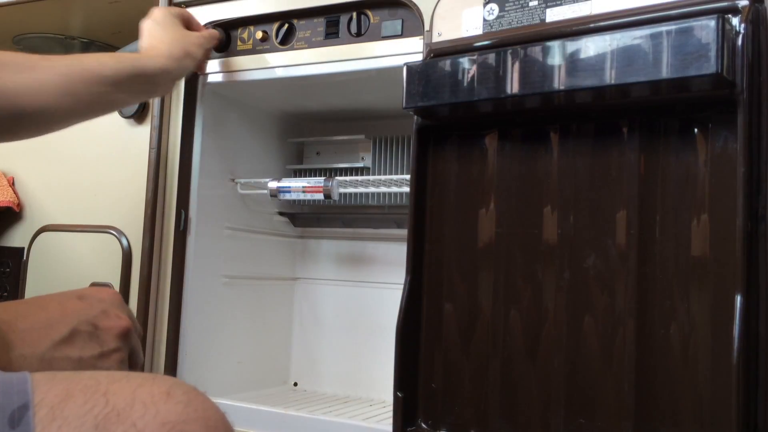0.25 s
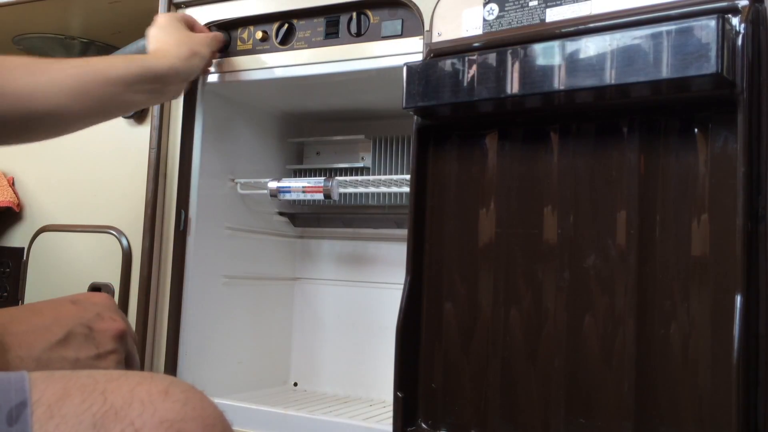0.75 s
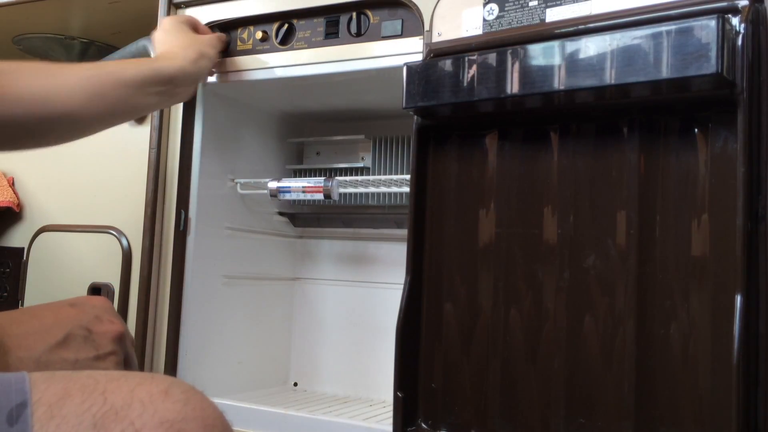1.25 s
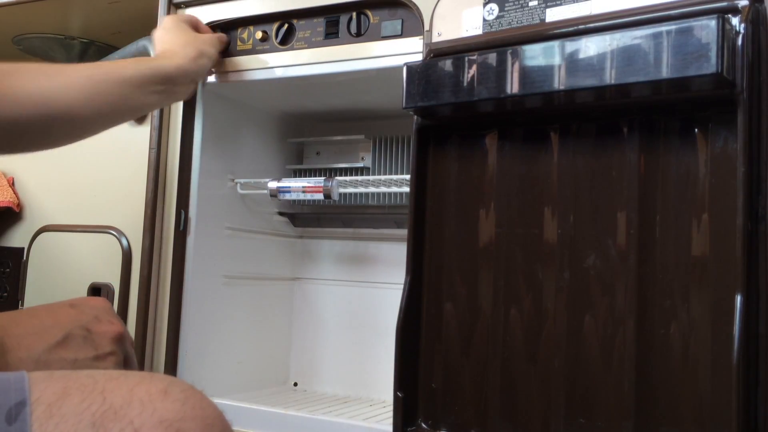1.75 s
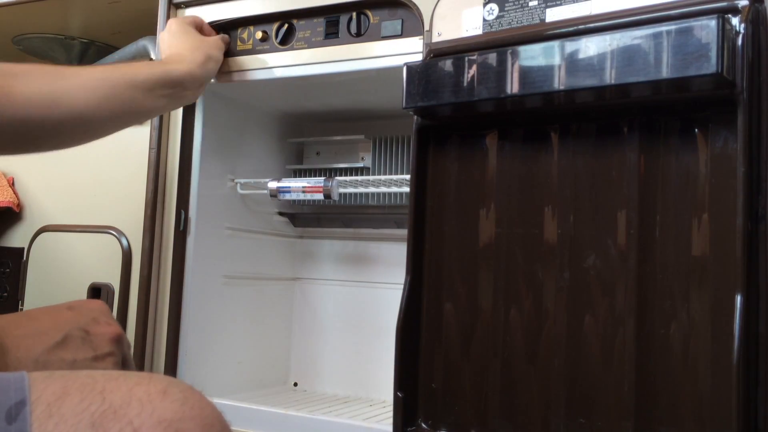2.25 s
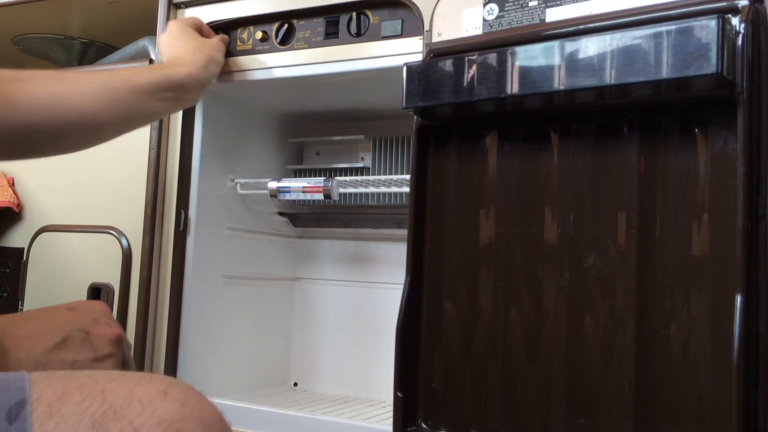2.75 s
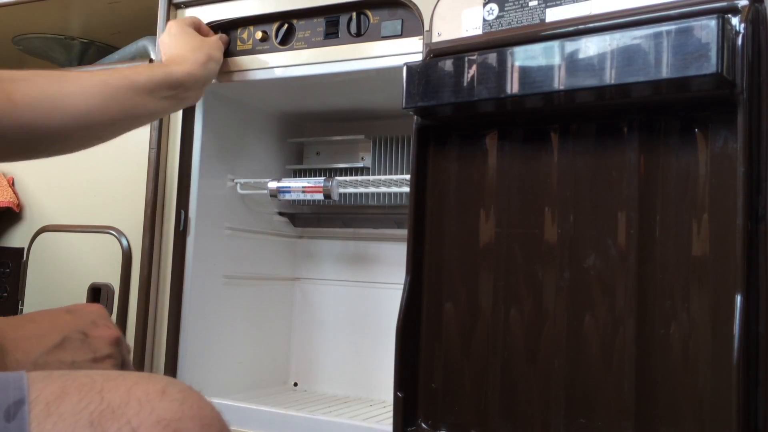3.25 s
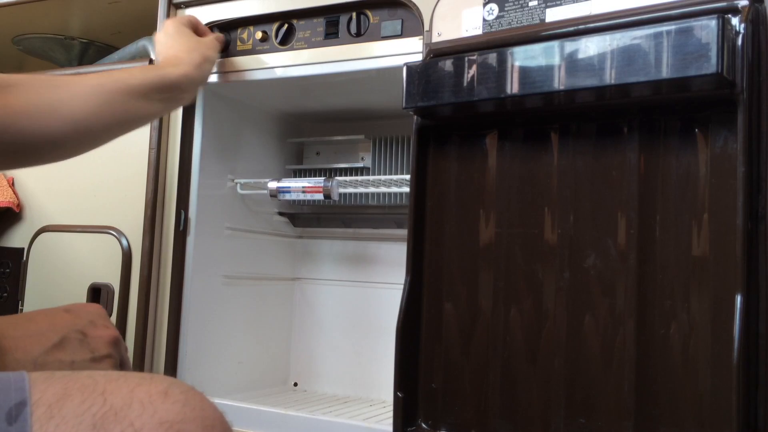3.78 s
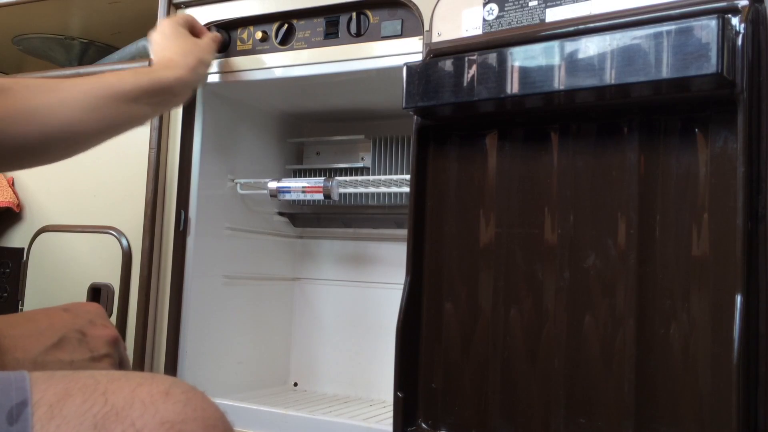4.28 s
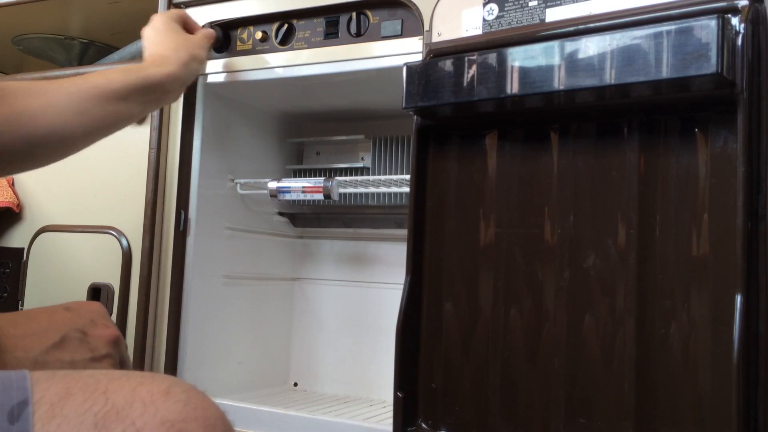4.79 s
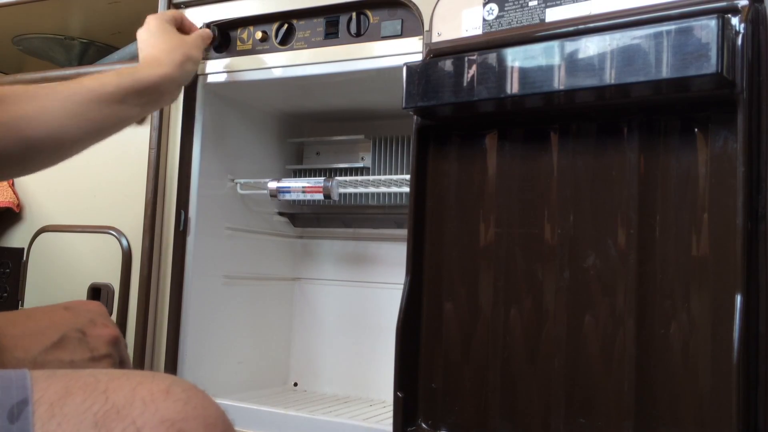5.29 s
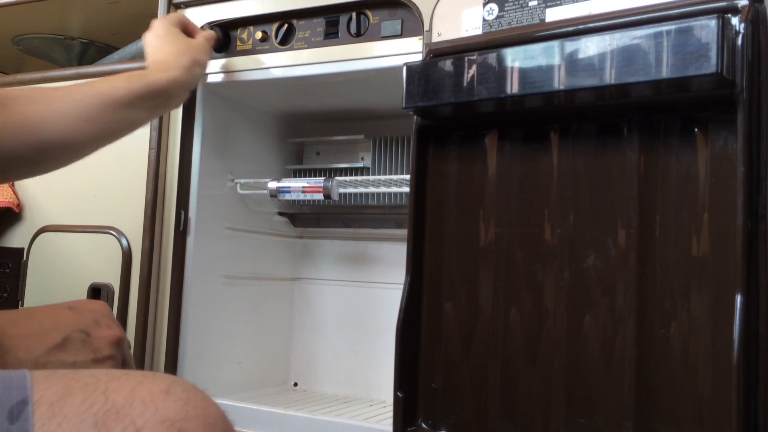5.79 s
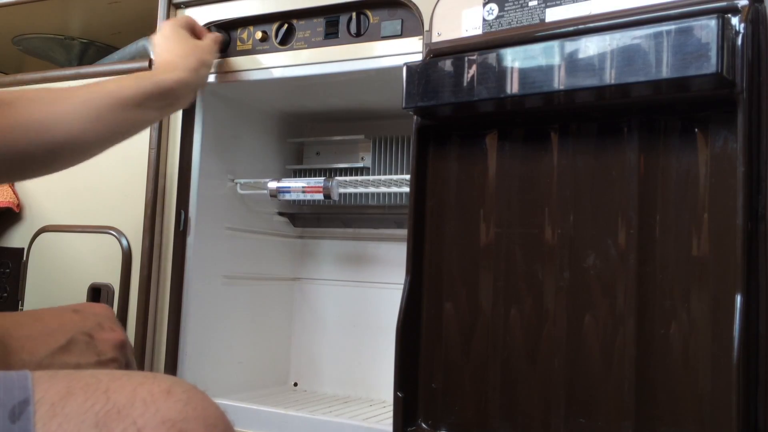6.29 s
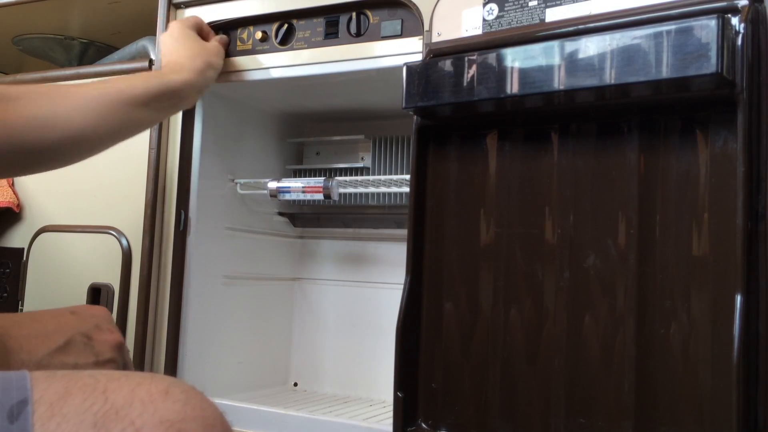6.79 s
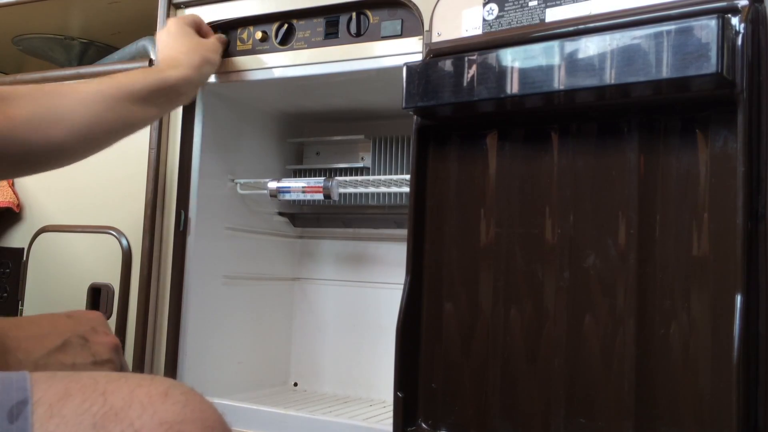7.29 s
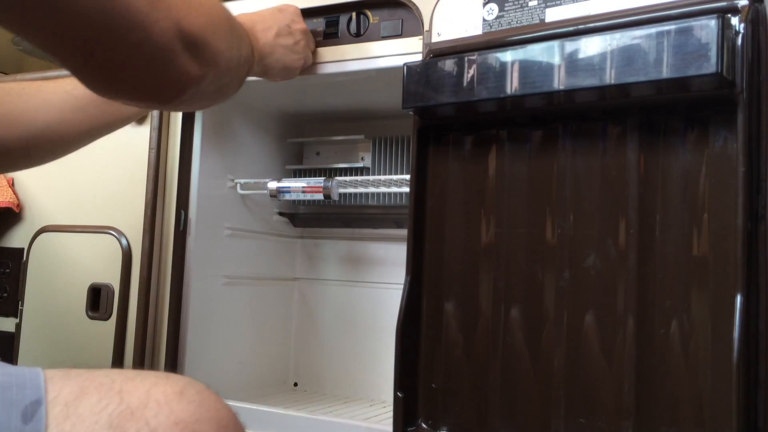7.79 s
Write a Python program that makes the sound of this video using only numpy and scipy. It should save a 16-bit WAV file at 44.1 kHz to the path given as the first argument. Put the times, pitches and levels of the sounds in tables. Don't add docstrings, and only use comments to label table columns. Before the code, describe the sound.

Rapid steady mechanical clacking, each push a rising squeak and hard slam then a duller knock back, close up in a quiet camper cabin.

```python
import sys
import numpy as np
from scipy import signal
from scipy.fft import rfft, irfft
from scipy.io import wavfile
from scipy.ndimage import map_coordinates

SR = 44100
rng = np.random.default_rng(int(sys.argv[2]) if len(sys.argv) > 2 else 0)


def gain_from_db(level_db):
    decades = np.asarray(level_db, float) / 20
    return 10 ** decades


def generate_wav(signal):
    frames = np.transpose(np.atleast_2d(signal))
    scaled = np.clip(frames, -1, 1) * 32767
    pcm = np.round(scaled).astype(np.int16)
    wavfile.write(sys.argv[1], SR, pcm)


N = 354475


def unit(x):
    return x / np.sqrt(np.mean(x ** 2) + 1e-20)


def along(points, hz):
    f, v = np.transpose(points)
    return np.interp(np.log(hz + 1), np.log(f + 1), v)


def wobble(rate):
    knots = rng.standard_normal(int(N * rate / SR) + 4)
    return map_coordinates(knots, [np.arange(N) * rate / SR])


def causal(x, gain):
    size = 2 ** 13
    cepstrum = irfft(np.log(gain(np.fft.rfftfreq(size, 1 / SR)) + 1e-6))
    cepstrum[1:size // 2] *= 2
    cepstrum[size // 2 + 1:] = 0
    impulse = irfft(np.exp(rfft(cepstrum)))
    return signal.oaconvolve(x, impulse / np.linalg.norm(impulse))[:len(x)]


def resonant(modes, hz):
    return sum(gain_from_db(2 * db) / (1 + (2 * (hz - c) / max(w, 42)) ** 2) for c, w, db in modes)


def swell(t, rise, t60, hold):
    shape = (1 - np.exp(-t / rise)) * gain_from_db(-60 * t / t60) * np.exp(-(t / hold) ** 4)
    return shape / shape.max()


def tone(hz):
    return np.sin(2 * np.pi * (np.cumsum(hz) / SR + rng.random()))


def toned(events, usual_db, boom_db, body_db, boom_share, body_share):
    rows = []
    for s, db, *extra_boom in events:
        harder = db - usual_db
        boom = boom_db - boom_share * harder + sum(extra_boom)
        rows.append((s, db, boom, body_db - body_share * harder))
    return rows


def contacts(events, shake, modes, colour, boom_db, valley_db, grit_db, jolts):
    t = np.arange(SR // 8) / SR

    def body(hz):
        between_modes = gain_from_db(2 * (along(colour, hz) + valley_db))
        return np.sqrt(resonant(modes, hz) + between_modes)

    def edge(hz, corner):
        return 1 / np.sqrt(1 + (hz / corner) ** 8)

    bands = [lambda hz: edge(hz, 900),
             lambda hz: edge(900, hz + 1) * edge(hz, 4500),
             lambda hz: edge(4500, hz + 1)]
    out = np.zeros(N)
    for k, timing in enumerate(shake):
        level = np.zeros(N + len(t))
        for s, db, low_db, body_db in events:
            band_db = (low_db + boom_db, body_db, 0)[k]
            level[round(s * SR):][:len(t)] += gain_from_db(db + band_db) * swell(t, *timing)
        force = level[:N] * gain_from_db(grit_db * wobble(jolts)) * rng.standard_normal(N)
        out += causal(force, lambda hz: body(hz) * bands[k](hz))
    return out


def hollow(events, hz, bend, shake, level_db):
    t = np.arange(SR // 8) / SR
    out = np.zeros(N + len(t))
    for s, db, boom_db, _ in events:
        note = tone(hz * (1 + 0.019 * rng.standard_normal()) + bend * t)
        out[round(s * SR):][:len(t)] += gain_from_db(db + boom_db + level_db) * swell(t, *shake) * note
    return out[:N] * gain_from_db(2.5 * wobble(110))


def chime(events, modes, t60, scatter_db, level_db):
    t = np.arange(SR // 8) / SR
    hz, _, mode_db = np.transpose(modes)[..., None]
    luck = rng.standard_normal((len(events), 2, len(modes), 1))
    out = np.zeros(N + len(t))
    for (s, db, *_), (size, drift) in zip(events, luck):
        sines = np.sin(2 * np.pi * hz * (1 + .012 * drift) * t)
        ring = gain_from_db(.4 * mode_db + scatter_db * size) * sines
        out[round(s * SR):][:len(t)] += gain_from_db(db + level_db) * swell(t, 0.00094, t60, 0.025) * ring.sum(0)
    return out[:N] * gain_from_db(4 * wobble(400))


# t/s, level/dB
RUMBLE_LEVEL = [(0.0, -35.5), (0.06, -52.5), (0.42, -48), (0.54, -51), (2.2, -50.5), (2.64, -47),
                (2.98, -54), (3.2, -46), (3.5, -52.5), (7.3, -51.5), (8.04, -58.5)]
RUSTLE_LEVEL = [(0.0, -59.5), (7.3, -56), (8.04, -64.5)]
# f/Hz, level/dB per Hz
RUMBLE_COLOUR = [(12, -45.5), (20, -12.5), (96, 4), (153, 3), (193, -18), (230, -2.5), (300, -9),
                 (510, -120)]
RUSTLE_COLOUR = [(250, -36), (500, 12.5), (1000, 5), (2000, -5.5), (3500, -13.5), (8000, -18), (15000, -21)]
HISS_COLOUR = [(120, -21.5), (200, -21), (259, -13.5), (579, -30.5), (2420, -32), (3250, -33), (8270, -38),
               (11700, -39.5), (14600, -44), (16000, -49)]


def cabin_air():
    def level(curve):
        return np.interp(np.arange(N) / SR, *np.transpose(curve))

    def noise(colour):
        return unit(causal(rng.standard_normal(N), lambda hz: gain_from_db(along(colour, hz))))

    rumble = gain_from_db(level(RUMBLE_LEVEL) + 3 + 1.5 * wobble(9)) * noise(RUMBLE_COLOUR)
    rustle = gain_from_db(level(RUSTLE_LEVEL) - 4 + 2.5 * wobble(14) + 3 * wobble(200)) * noise(RUSTLE_COLOUR)
    hiss = gain_from_db(-66.5 + 1.4 * wobble(21)) * noise(HISS_COLOUR)
    return rumble + rustle + hiss


# start t/s, end t/s, f/Hz, level/dB
RINGS = [(0, 0.252, 104.1, -41.5), (0.241, 0.443, 116.3, -34.5), (0, 0.287, 181.6, -45),
         (.083, 0.122, 1222, -46.5), (0.093, 0.122, 5120, -56), (.09, 0.14, 3870, -64),
         (0.146, 0.183, 555, -51), (3.93, 4.0, 2600, -70), (4.668, 4.73, 2600, -73),
         (6.775, 6.85, 3850, -76), (7.664, 7.71, 4650, -64)]


def rings():
    out, unsteady = np.zeros(N), wobble(300)
    for start, end, hz, db in RINGS:
        span = slice(round(start * SR), round(end * SR))
        size = span.stop - span.start
        rough = 1 + min(hz / 1500, .6) * unsteady[span]
        out[span] += gain_from_db(db - 3) * np.hanning(size) ** 0.14 * rough * tone(np.full(size, hz))
    return out


# t/s, sizzle peak level/dB, boom and body level/dB relative to it
RAPS = [(0.0004, -41.5, -4.5, 4.5), (0.197, -46, -16, -6), (0.2767, -39.5, -6, 1.5),
        (1.4984, -38, -3.5, 5.5), (1.753, -37.5, -8, 1.5), (2.2455, -40, -7, 4), (2.4735, -30.5, -10, 8),
        (2.741, -49, -2.5, 8), (3.2248, -27.5, -10.5, 2), (4.198, -65, 10.5, 11), (4.4473, -40.5, -3.5, 5),
        (5.3728, -34.5, -9, 2.5), (5.8485, -47, -1, 15), (6.082, -50.5, -0.5, 5), (6.319, -38.5, -6, 6.5),
        (6.556, -48.5, 0.5, 9)]
# rise t/s, t60 t/s, damped-out t/s
STRIP_SHAKE = [(0.0029, 0.29, 0.046), (0.0011, 0.064, 0.05), (0.00093, 0.081, 0.045)]
# f/Hz, width/Hz, level/dB
STRIP_MODES = [(937, 45, -15), (1320, 84, -15), (1610, 80, -15.5), (1920, 170, -17.5), (2690, 60, -25.5),
               (6920, 68, -19.5)]
# f/Hz, level/dB per Hz
STRIP_COLOUR = [(71, -61), (120, -17), (301, -9.5), (1620, -20.5), (2430, -26), (2700, -12.5),
                (4410, -36.5), (6910, -28), (12500, -32.5), (16000, -80)]


def strip_raps():
    blows = contacts(RAPS, STRIP_SHAKE, STRIP_MODES, STRIP_COLOUR,
                     boom_db=10.0, valley_db=-8.0, grit_db=1.5, jolts=230)
    return gain_from_db(-6.0) * blows + hollow(RAPS, 298.7, 120, (.008, .2, .05), level_db=7.0)


# t/s, sizzle peak level/dB, boom and body level/dB relative to it
STRAY_TICKS = [(0.054, -51, 3, -14), (0.083, -45.5, -1, 5), (0.1274, -57, 15, 11), (1.5574, -47.5, -6, 3),
               (1.808, -48, -17, 4), (2.292, -45, -8, 5), (3.29, -45.5, 10, 2), (3.498, -52.5, 0, 3),
               (7.8016, -53, 9, 6), (7.889, -49, -3, -15)]
# t/s, sizzle peak level/dB
RELEASES = [(0.4489, -42), (1.1762, -42), (1.4217, -51), (1.6697, -36), (1.919, -36.5), (2.403, -34),
            (2.6583, -36), (3.1456, -40), (3.396, -36), (3.8776, -44), (4.353, -54), (4.598, -37.5),
            (5.066, -48), (5.5323, -43), (5.7665, -52), (6.4702, -40), (6.71, -57), (6.9396, -39.5),
            (7.6215, -45)]
LATCH_TONE = (-43, 0, -1, 0.84, 1.4)
# rise t/s, t60 t/s, damped-out t/s
LATCH_SHAKE = [(0.0043, 0.055, 0.01), (0.00012, 0.064, 0.09), (0.00054, 0.087, 0.063)]
# f/Hz, width/Hz, level/dB
LATCH_MODES = [(305, 180, 1), (1320, 380, 0.5), (4140, 58, 0), (7300, 420, -9)]
# f/Hz, level/dB per Hz
LATCH_COLOUR = [(120, -18), (500, -12), (2000, -4), (4000, -11.5), (7000, -19), (15000, -26)]


def latch_ticks():
    events = toned(RELEASES, *LATCH_TONE) + STRAY_TICKS
    return gain_from_db(-12.5) * contacts(events, LATCH_SHAKE, LATCH_MODES, LATCH_COLOUR,
                                 boom_db=4.5, valley_db=2, grit_db=5.5, jolts=210)


# start t/s, squeak top f/Hz, squeak level/dB, scrape level/dB
PUSHES = [(0.329, 5120, -50, -56.5), (0.574, 5900, -50, -53.5), (0.814, 5400, -53, -53),
          (1.05, 6200, -46.5, -54), (1.295, 5900, -45, -54), (1.535, 6500, -45, -53.5),
          (1.801, 5700, -44.5, -58.5), (2.033, 6250, -44, -53.5), (2.285, 6900, -42, -57),
          (2.528, 6400, -42.5, -55), (2.776, 6000, -46, -54.5),
          (3.034, 6570, -48, -53), (3.276, 5600, -42.5, -57.5), (3.509, 5570, -45, -52),
             (3.753, 5780, -44, -53.5), (3.993, 5740, -44, -52.5), (4.234, 6700, -39.5, -51.5),
             (4.476, 5770, -40.5, -55.5), (4.713, 6100, -42.5, -56), (4.942, 6200, -45, -53),
             (5.182, 5600, -46, -55), (5.416, 6250, -42, -52.5), (5.644, 6330, -45, -60),
             (5.888, 5400, -43.5, -58), (6.123, 5640, -45, -62), (6.355, 6400, -43, -51.5),
             (6.59, 5840, -45, -58), (6.824, 6400, -49, -53), (7.041, 6600, -53, -55.5),
             (7.292, 5670, -51, -53.5), (7.498, 5000, -52, -54)]
# f/Hz, level/dB
SEAL = [(1500, -20), (3500, -17), (4600, -12), (5150, -2), (6000, -1), (7500, -4)]
# f/Hz, width/Hz, level/dB
STEM = [(305, 61, 6), (1420, 1040, 10.5), (3800, 2600, -3.5)]


def push():
    squeak, rub = np.zeros(N), np.zeros(N)
    waver, flutter = wobble(500), gain_from_db(3.7 * wobble(180))
    broken = (.7 + .6 * wobble(600)) * gain_from_db(2 * wobble(130))
    grind, beat = .6 + .7 * wobble(330), wobble(90)
    stops = np.sort([row[0] for row in SLAM_EARLY + SLAM_LATE + GRAZES])
    for s, top_hz, squeak_db, scrape_db in PUSHES:
        stop = stops[stops > s][0]
        speed_up = (stop - s) * (.065 + .1 * max(top_hz - 5000, 0) / 1000)
        loudest = stop - .027
        span = slice(round(s * SR), round(stop * SR))
        t = np.arange(span.stop - span.start) / SR
        hz = top_hz * (1 - np.exp(-t / speed_up)) * (1 + .015 * waver[span])
        fade = .22 + .78 * np.exp(-((t + s - loudest) / .02) ** 2)
        stem_hz = 880 + 6500 * t
        sidebands = gain_from_db(-19 + 3 * beat[span]) * grind[span] * (tone(hz + stem_hz) + tone(.72 * hz))
        radiated = gain_from_db(squeak_db - 2 + along(SEAL, hz))
        squeak[span] += radiated * fade * broken[span] * (tone(hz) + sidebands)
        stem_level = gain_from_db(scrape_db + 5) * swell(t, 0.00944, 0.17, 0.13)
        squeak[span] += stem_level * grind[span] * tone(stem_hz)
        dig_in = 7.5 * np.exp((t - t[-1]) / 0.0063)
        rub[span] += gain_from_db(scrape_db - 7.5) * (np.minimum(t / 0.013, 1) + dig_in)
    scrape = causal(rub * flutter * rng.standard_normal(N), lambda hz: np.sqrt(resonant(STEM, hz)))
    return squeak + scrape


# t/s, sizzle peak level/dB
SLAM_EARLY = [(0.3972, -28.5), (0.629, -23.5), (0.8709, -24.5), (1.1094, -23), (1.3588, -24),
              (1.6059, -24.5), (1.8547, -24.5), (2.0932, -23), (2.3359, -21.5), (2.588, -24),
              (2.8419, -23.5)]
SLAM_LATE = [(3.081, -23), (3.3398, -28.5), (3.5668, -24), (3.8157, -25.5), (4.0537, -26), (4.2896, -23),
             (4.5431, -25), (4.7671, -22.5), (5.0065, -23.5), (5.2345, -24), (5.474, -23.5),
             (5.7014, -23.5), (5.9539, -28), (6.1868, -27), (6.4143, -24), (6.6568, -26), (6.8803, -23),
             (7.0993, -22.5), (7.3472, -26), (7.5502, -25)]
# t/s, sizzle peak level/dB, boom and
# body level/dB relative to it
GRAZES = [
    (3.3244, -37, 6.5, 6.6),
    (5.9399, -49.5, 11, 2.9),
    (6.1701, -46, 9, 5),
    (6.6444, -44, 7.5, 3.9),
    (7.8432, -44, -21, 0.17),
    (7.9972, -60, 2, 9.8),
]
SLAM_TONE = (-24, -4.5, -2, -0.5, 0.35)
# rise t/s, t60 t/s, damped-out t/s
SLAM_SHAKE = [(.008, .15, .042), (.001, .095, .042), (.0006, .085, .04)]
# f/Hz, width/Hz, level/dB
PANEL_MODES = [(282.6, 23.3, 1), (484, 19, -1.5), (912, 52, -6), (1602, 50, -5), (2716, 170, -11),
               (3448, 112, -14.5), (4090, 57, -14), (5110, 32, -21.5), (6060, 210, -20.5),
               (6400, 60, -23.5), (7500, 136, -25.5)]
# f/Hz, level/dB per Hz
PANEL_COLOUR = [(70, -46), (140, -25.5), (390, -17.5), (1100, -8), (2200, -16), (4500, -28), (7500, -23),
                (9600, -39), (14700, -37), (16000, -30)]


def slams():
    events = toned(SLAM_EARLY + SLAM_LATE, *SLAM_TONE) + GRAZES
    blows = contacts(events, SLAM_SHAKE, PANEL_MODES, PANEL_COLOUR,
                     boom_db=-0.5, valley_db=-3, grit_db=2.5, jolts=400)
    cavity = hollow(events, 573.2, 3140, (.018, .4, .04), level_db=-4.5)
    ringing = chime(events, PANEL_MODES[3:], 0.057, scatter_db=4.0, level_db=-19.5)
    return gain_from_db(-6) * blows + cavity + ringing


# t/s, sizzle peak level/dB, extra boom level/dB
BACKS = [(0.4658, -53, -1.5), (0.7137, -42, 1.5), (0.9531, -44.5, 2), (1.2032, -39, 1),
         (1.4457, -43.5, -1.5), (1.6955, -39, 0.5), (1.942, -40, 1.5), (2.184, -39, 5),
         (2.4258, -37, 4.5), (2.6822, -36.5, 1),
         (2.948, -29, 5.5), (3.173, -42.5, 3), (3.4136, -38.5, 2.3), (3.6514, -39, 1),
             (3.898, -38.5, -1), (4.133, -44.5, -5), (4.3804, -36.5, -2.5), (4.613, -39.5, 0.7),
             (4.8547, -39, 2), (5.092, -38, -1.5), (5.3158, -43, 0.5), (5.557, -42, -1),
             (5.7906, -35.5, -1), (6.0187, -45, 1.5), (6.2541, -41.5, -3.5), (6.492, -40.5, 0),
             (6.729, -41, -4), (6.9668, -36.5, -2.5), (7.2007, -37, 0.5), (7.422, -38.5, 2),
             (7.6472, -40, 0)]
BACK_TONE = (-40, 0.45, 3.5, 0.95, 0.72)
# rise t/s, t60 t/s, damped-out t/s
BACK_SHAKE = [(.012, .2, .045), (.002, .2, .042), (.001, .13, .042)]
# f/Hz, width/Hz, level/dB
COLLAR_MODES = [(1600, 90, -15), (2050, 120, -17), (2600, 120, -16), (3460, 100, -20), (4660, 60, -27)]
# f/Hz, level/dB per Hz
COLLAR_COLOUR = [(71, -49.5), (120, -19), (295, -12.5), (805, -27.5), (1290, -14.5), (1580, -12.5),
                 (3380, -10.5), (4320, -21.5), (13900, -22.5), (16000, -22)]


def spring_backs():
    events = toned(BACKS, *BACK_TONE)
    blows = contacts(events, BACK_SHAKE, COLLAR_MODES, COLLAR_COLOUR,
                     boom_db=3.5, valley_db=-12, grit_db=3.5, jolts=150)
    cavity = hollow(events, 293.6, 240, (.012, .3, .05), level_db=1)
    ringing = chime(events, COLLAR_MODES[:4], .08, scatter_db=4.5, level_db=-11.5)
    return gain_from_db(-7) * blows + cavity + ringing


# t/s, sizzle peak level/dB, boom and body level/dB relative to it
BANG = [
    (2.8785, -13, -1.2, 2.3),
]
# rise t/s, t60 t/s, damped-out t/s
BANG_SHAKE = [(0.0023, 0.17, 0.058), (0.0011, 0.16, 0.037), (0.00099, 0.12, .07)]
# f/Hz, width/Hz, level/dB
DOOR_MODES = [(265, 70, -3), (560, 90, -5), (650, 50, -6), (1790, 90, -8), (2870, 80, -3), (3060, 70, -1),
              (3450, 150, -7), (4200, 150, -12), (6900, 120, -19)]
# f/Hz, level/dB per Hz
DOOR_COLOUR = [(100, -58), (190, -34), (260, 1), (600, -15.5), (1200, -7), (2000, -12), (3200, -1.5),
               (4500, -39), (6000, -24.5), (14500, -32), (16000, -57)]


def door_bang():
    blow = contacts(BANG, BANG_SHAKE, DOOR_MODES, DOOR_COLOUR,
                    boom_db=6, valley_db=-3, grit_db=2.5, jolts=400)
    return gain_from_db(-4) * blow + chime(BANG, DOOR_MODES[4:7], .09, scatter_db=1, level_db=-9)


# f/Hz, t60 t/s
CABIN_DECAY = [(200, 0.34), (1500, 0.21), (10000, 0.11)]


def cabin(x):
    hz, t, z = signal.stft(rng.standard_normal(SR // 3), SR, nperseg=256)
    decay = gain_from_db(-60 * t / along(CABIN_DECAY, hz)[:, None])
    tail = signal.istft(z * decay, SR, nperseg=256)[1]
    delayed = np.pad(x, (200, 0))
    return signal.fftconvolve(delayed, tail / np.linalg.norm(tail))[:N]


def scene():
    parts = rings() + strip_raps() + latch_ticks() + push() + slams() + spring_backs() + door_bang()
    return (parts + gain_from_db(-14) * cabin(parts) + cabin_air())[None]


def band_limit(x):
    return signal.sosfilt(signal.butter(12, 16470, fs=SR, output="sos"), x)


def record(dry):
    keep = np.exp(-1 / (.1 * SR))
    power = signal.lfilter([1 - keep], [1, -keep], dry ** 2)
    ducked = dry * (1 + power / gain_from_db(2 * -30)) ** -.4
    hz = np.fft.rfftfreq(N, 1 / SR)
    shelf = gain_from_db(np.interp(hz, [15200, 15600, 16500], [0, -22, -40]))
    mix = irfft(rfft(ducked) * shelf, N)
    return band_limit(mix)


dry = scene()
out = record(dry)
generate_wav(out)
```